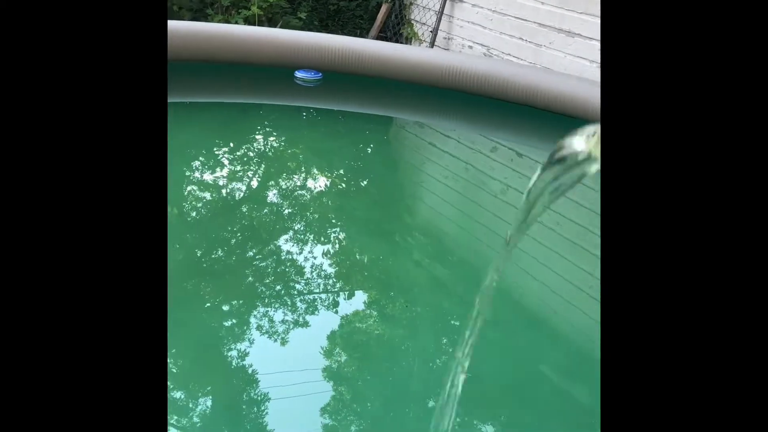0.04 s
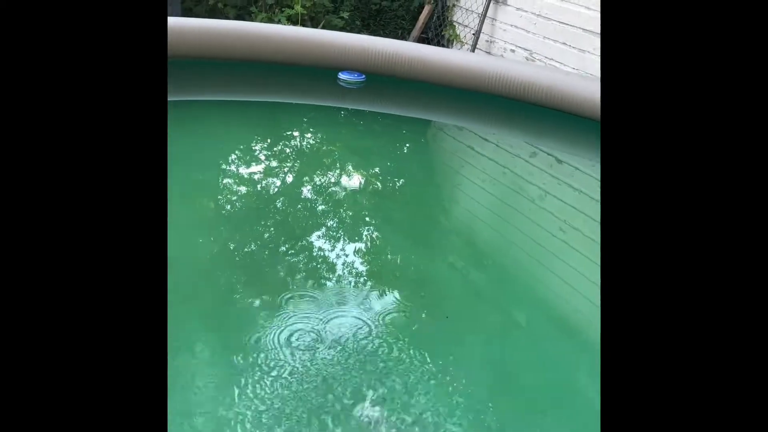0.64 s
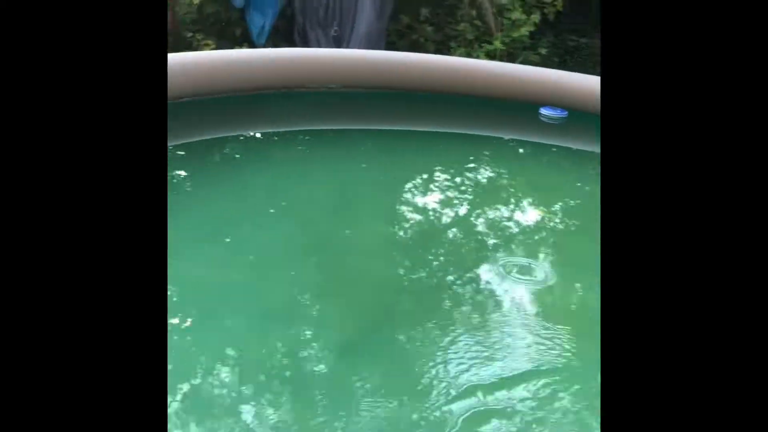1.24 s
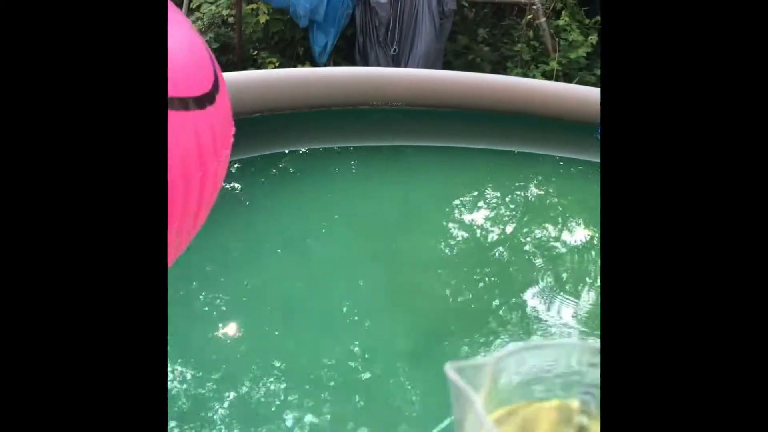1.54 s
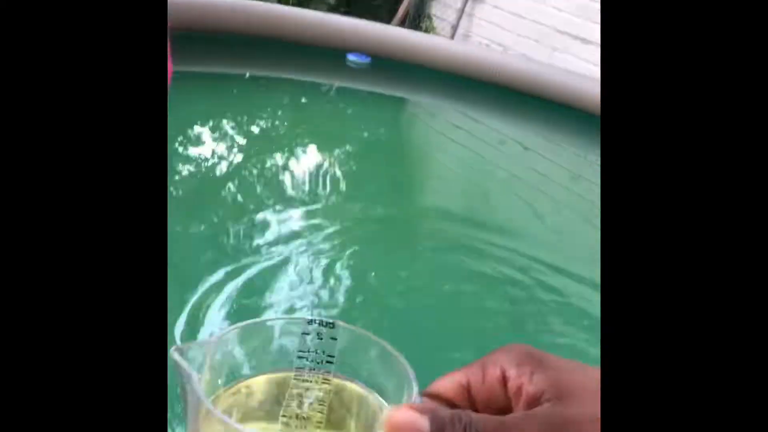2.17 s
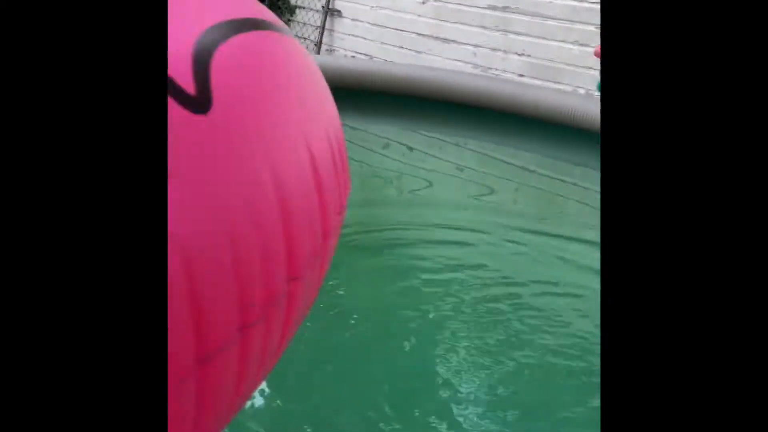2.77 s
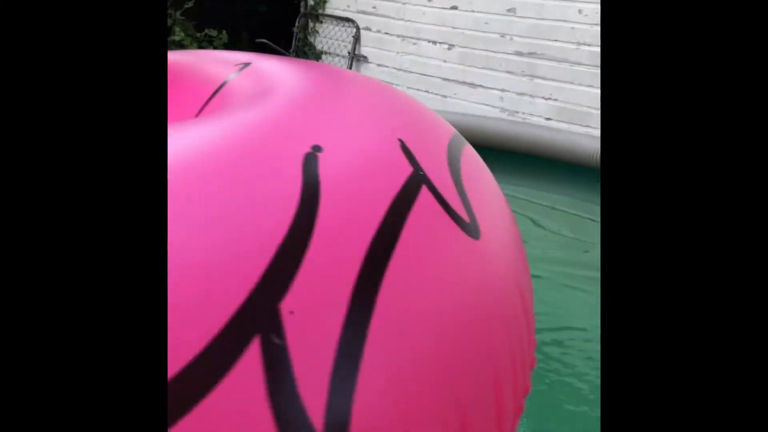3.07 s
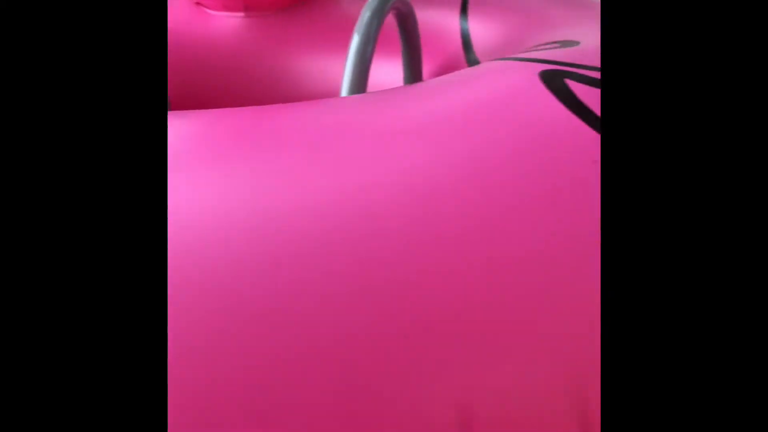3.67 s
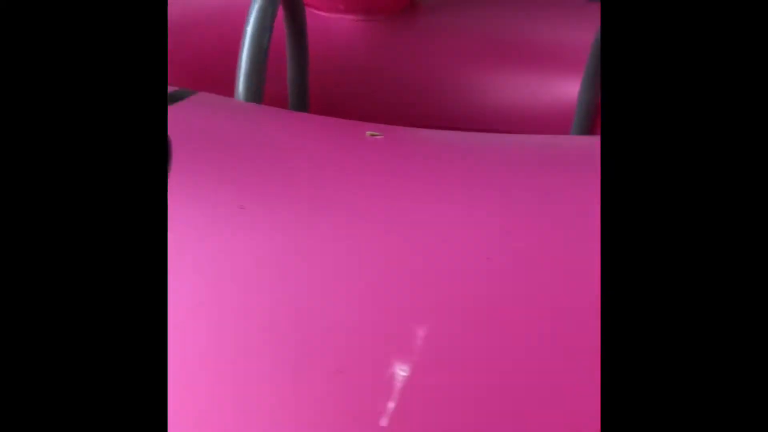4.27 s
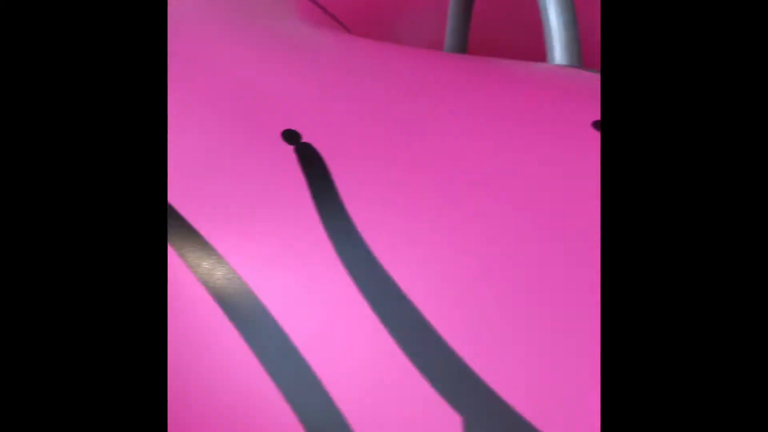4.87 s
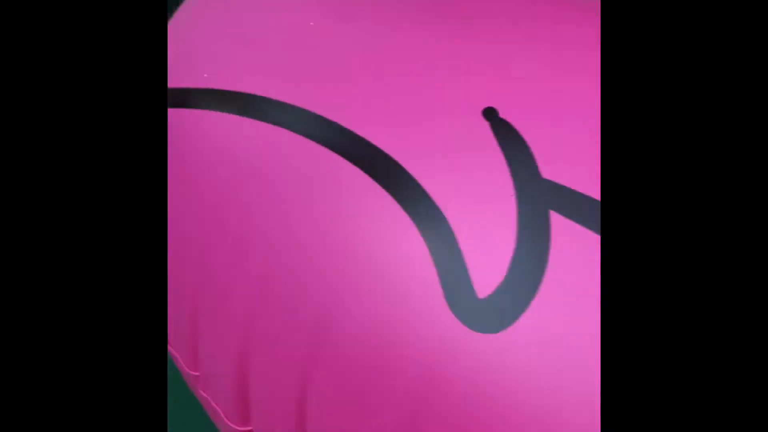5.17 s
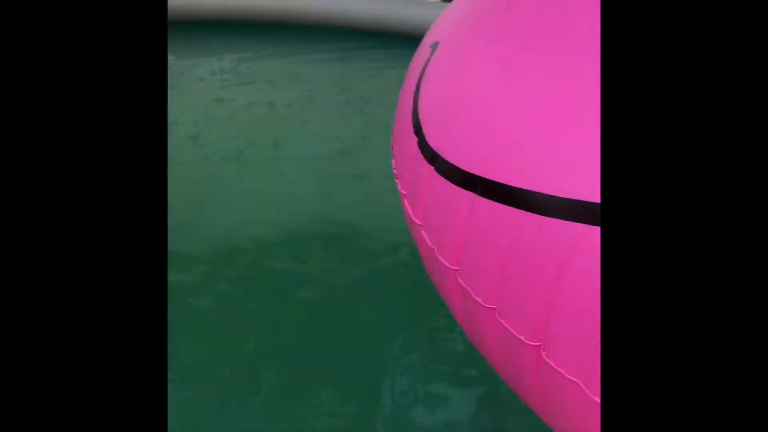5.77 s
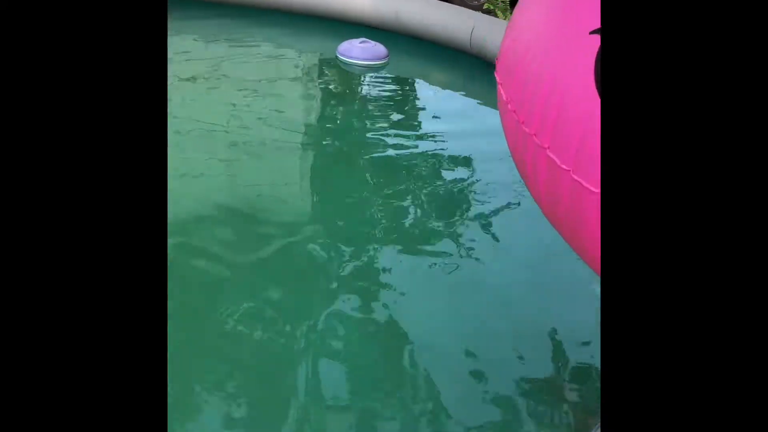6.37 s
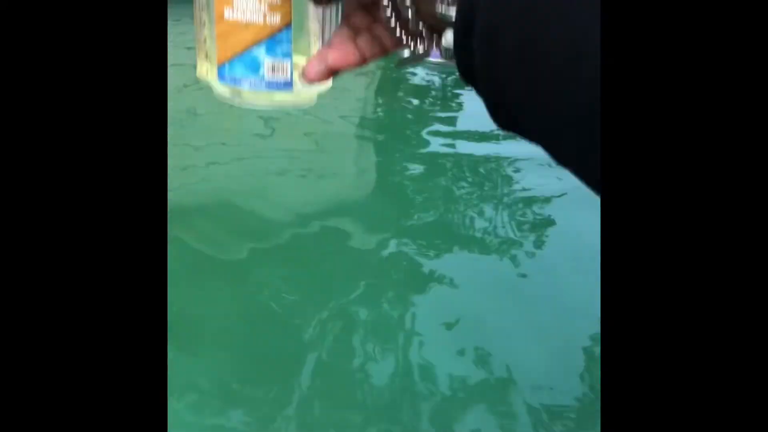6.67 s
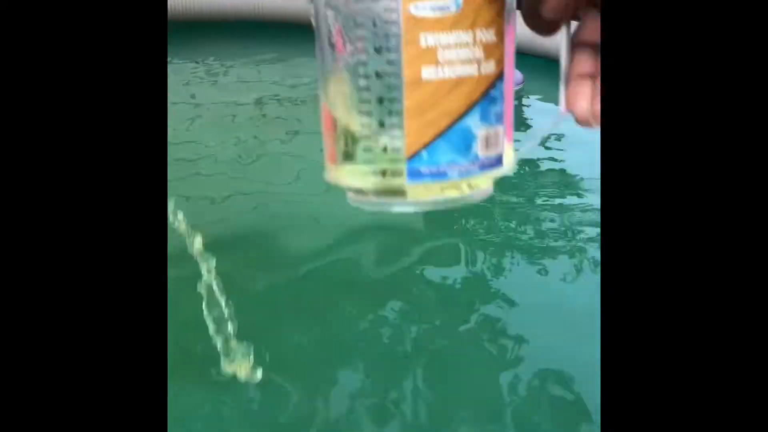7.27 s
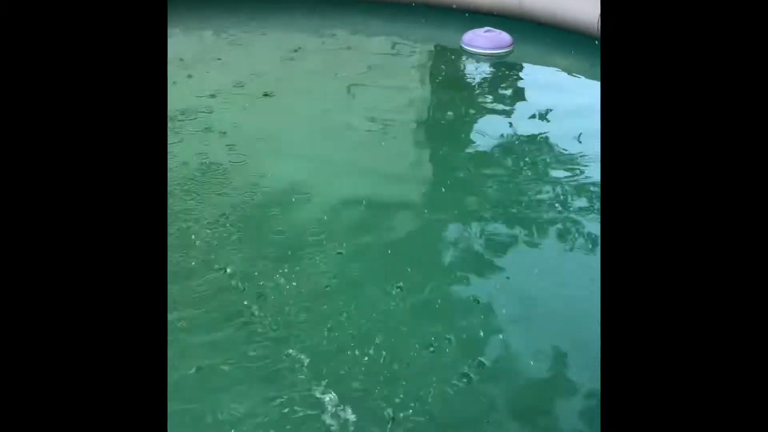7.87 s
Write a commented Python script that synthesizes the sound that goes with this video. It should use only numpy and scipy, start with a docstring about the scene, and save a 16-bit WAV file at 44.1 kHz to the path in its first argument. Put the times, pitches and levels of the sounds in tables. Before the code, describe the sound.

Liquid flung from a plastic jug patters into a garden pool with crackling spray and ringing bubbles, ending in drips. Someone walks round the pool with soft steps and rustling clothes, while small dry ticks sound and distant birds whistle. Near the end a second, shorter splash lands and droplets rain back down. A pump motor hums low throughout under a faint outdoor hush, all heard close to the water.

```python
"""Liquid is flung twice from a plastic jug into a garden pool. The stream patters, traps air bubbles that
ring like tiny bells, and ends in drips. The pool pump's motor hums throughout, under a faint outdoor hush.
Between the pours the person carrying the jug moves round the pool with soft steps and rustling clothes,
there are small dry ticks, and birds whistle in the trees. All is heard from close to the water."""
import sys
import numpy as np
from scipy import signal
from scipy.fft import rfft, irfft, next_fast_len
from scipy.io import wavfile
from scipy.ndimage import map_coordinates

SR = 44100
rng = np.random.default_rng(int(sys.argv[2]) if len(sys.argv) > 2 else 0)


def persist_wave(psi):
    """Save psi, clipped to +-1, as 16-bit WAV."""
    counts = np.round(np.clip(psi, -1, 1) * 32767).astype(np.int16)
    wavfile.write(sys.argv[1], SR, np.atleast_2d(counts).T)


N = 358533


def amp(db):
    """Turn decibels into a number to multiply a sound by."""
    return 10 ** (np.asarray(db) / 20)


def unit(x):
    """Scale a sound to an average (rms) level of 1."""
    return x / np.sqrt(np.mean(x ** 2) + 1e-20)


def curves(rows):
    """Join rows of (time_s, values...) with straight lines: one curve for each column of values."""
    times, *columns = np.transpose(rows)
    return [np.interp(np.arange(N) / SR, times, column) for column in columns]


def wobble(rate):
    """A smooth random curve that heads for a new value rate times a second."""
    points = rng.standard_normal(int(N * rate / SR) + 4)
    return map_coordinates(points, [np.arange(N) * rate / SR], order=2)


def filtered(x, response):
    """Turn each frequency in x up or down by response(hz)."""
    size = next_fast_len(N + 8192)
    return irfft(rfft(x, size) * response(np.fft.rfftfreq(size, 1 / SR)), size)[:N]


def band(x, low_hz, high_hz):
    """Gently fade out what lies below low_hz and above high_hz."""
    return signal.sosfilt(signal.butter(1, [low_hz, high_hz], "band", fs=SR, output="sos"), x)


def coloured(x, tone):
    """Shape x with rows of (pitch_hz, gain_db), then scale it to level 1."""
    pitches, db = np.transpose(tone)
    return unit(filtered(x, lambda hz: amp(np.interp(np.log(hz + 1), np.log(pitches), db, left=-120))))


def noise(tone):
    """Noise with the given tone, at level 1."""
    return coloured(rng.standard_normal(N), tone)


def add(track, start_s, sound):
    """Mix a sound into the track at start_s."""
    part = track[max(round(start_s * SR), 0):][:len(sound)]
    part += sound[:len(part)]


def fade(t, fade_s):
    """A dying-away curve that drops 60 dB every fade_s seconds."""
    return amp(-60 * t / fade_s)


def echo(x, fade_s):
    """The blur of sound bouncing back from walls, fence and trees."""
    t = np.arange(SR) / SR
    tail = rng.standard_normal(len(t)) * fade(t, fade_s) * (t > .005)
    return signal.fftconvolve(x, tail / np.linalg.norm(tail))[:N]


def grains(per_s, centre_hz, spread, cycles, scatter_db, rise, samples):
    """A steady swarm of tiny rings, like bubbles: each fades over a few cycles and rises in pitch."""
    when, pitch, loudness, life = np.hsplit(rng.random((int(per_s * N / SR), 4)), 4)
    hz = np.clip(centre_hz * np.exp(spread * (2 * pitch - 1)), 100, SR / 3)
    strength = amp(scatter_db * np.minimum(-np.log(1 - loudness), 3))
    turns = hz * np.arange(samples) / SR
    age = turns / (cycles * (.5 + life))
    shape = strength * np.sqrt(hz) * np.exp(-age) * (1 - np.exp(-2 * turns))
    rings = shape * np.sin(2 * np.pi * turns * (1 + rise * age))
    where = (when * N).astype(int) + np.arange(samples)
    return unit(np.bincount(where.ravel(), rings.ravel(), N)[:N])


def pump():
    """The motor drones and buzzes, and whirrs in pulses twice a turn, over the rumble of moving water."""
    # the hum shifts as the listener moves through its loud and quiet spots (standing waves)
    # relative levels: time_s, drone_db, buzz_db, growl_db
    levels = [(0.8, -43, -52, -60.5), (1.39, -44, -59, -67), (2.51, -47, -52.5, -55.5),
              (2.96, -44.5, -60.5, -55.5), (3.49, -54.5, -60.5, -59), (3.92, -52.5, -66, -67.5),
              (5.62, -49.5, -64, -62), (6.25, -46, -54, -64), (7.21, -46.5, -60.5, -57.5),
              (7.6, -44.5, -61, -66.5), (8.13, -47.5, -52, -56.5)]
    # motor speed: time_s, turns_per_s
    speed = [(0, 41.45), (2.5, 41.25), (4.5, 41.05), (8.13, 40.95)]
    # the motor's low, middle and high tones: multiple_of_speed, level_db (relative for growl and buzz)
    drone_tones = [(2, -58), (3, -62), (5, -64)]
    growl_tones = [(7.5, -3), (8, 1)]
    buzz_tones = [(9, -9), (10, 2), (11, -7), (12, .5), (14, -4), (16, -9)]
    # tone of the whirr and of the moving water: pitch_hz, gain_db
    whirr_tone = [(240, -24), (380, 10.5), (480, 3.5), (680, -0.5), (1100, -22)]
    rumble_tone = [(22, -30), (38, -9.5), (55, 2), (85, 1.5), (130, -1), (250, -8), (420, -11), (1100, -18),
                   (2500, -53)]
    drone_db, buzz_db, growl_db = curves(levels)
    angle = 2 * np.pi * np.cumsum(curves(speed)[0] * (1 + 0.00079 * wobble(3.9))) / SR

    def hum(tones, waver_db):
        out = np.zeros(N)
        for multiple, db in tones:
            level = amp(db + waver_db * wobble(2.02))
            offset = 2 * np.pi * (multiple % 2) * rng.random()  # even multiples stay in step
            out += level * np.cos(multiple * angle + offset)
        return np.sqrt(2) * out

    buzz = amp(buzz_db - 0.5) * unit(hum(buzz_tones, waver_db=0.8))
    growl = amp(growl_db - 1.5) * unit(hum(growl_tones, waver_db=1.0))
    drone = amp(drone_db - 1) * np.sqrt(2) * np.cos(4 * angle) + hum(drone_tones, waver_db=0.5)
    whirr_db = -63.5 + 0.8 * (buzz_db - buzz_db.mean())  # swells with the buzz
    whirr = amp(whirr_db) * unit((1 + np.cos(2 * angle)) * noise(whirr_tone))
    t = np.arange(N) / SR
    faint_db = np.interp(t, [3, 5, 5.8, 7], [-71, -64.5, -60.5, -66.5])
    faint_hum = amp(faint_db) * np.sqrt(2) * np.sin(2 * np.pi * 226.4 * t)
    return drone + buzz + growl + whirr + faint_hum + amp(-54.5) * noise(rumble_tone)


def garden():
    """The faint hush of the open air."""
    # tone of the hush: pitch_hz, gain_db
    hush_tone = [(400, -11.5), (700, 1), (1300, -1.5), (2200, -4.5), (4200, -8), (7000, -15.5),
                 (11000, -22), (16000, -27)]
    return amp(-61.5 + 1.3 * wobble(4.37)) * noise(hush_tone)


def landing_levels():
    """Relative dB of splash and spray as the liquid lands: each pour builds, breaks off and fizzes out."""
    # each fling of the jug: start_s, length_s, build_up_s, splash_db, spray_db, burst_at_s, burst_db
    pours = [(0.043, 0.58, 0.21, -37.5, -38, 0.62, 5.5), (7.213, 0.21, 0.014, -42.5, -40.3, 7.292, 6.5)]
    cut_db_per_s, fizz_db_per_s = 329, 69
    t = np.arange(N) / SR
    splash_power, spray_power = np.full((2, N), 1e-12)
    for start_s, length_s, build_up_s, splash_db, spray_db, burst_at_s, burst_db in pours:
        age = np.maximum(t - start_s, 0)
        since_end = np.maximum(age - length_s, 0)
        flow = np.maximum(amp(-cut_db_per_s * since_end), amp(-7 - fizz_db_per_s * since_end))
        breakup_db = burst_db * np.exp(-((t - burst_at_s) / 0.033) ** 2)  # a brief burst into spray
        splash_power += (amp(splash_db) * flow * (1 - np.exp(-age / build_up_s))) ** 2
        spray_power += (amp(spray_db + breakup_db) * flow * (1 - np.exp(-age / 0.014))) ** 2
    # spray thrown up by the second, harder fling rains back on the pool
    rain_start_s, rise_s, fall_db_per_s = 7.44, 0.16, 31
    age = np.maximum(t - rain_start_s, 0)
    rain = np.minimum(age / rise_s, 1) ** 2 * amp(-fall_db_per_s * np.maximum(age - rise_s, 0))
    splash_power += (amp(-41) * rain) ** 2
    spray_power += (amp(-44.5) * rain) ** 2
    return 10 * np.log10(splash_power), 10 * np.log10(spray_power)


def stream_share(spray_db):
    """How much of the spray is an unbroken stream (1) rather than loose droplets (0)."""
    return 1 / (1 + np.exp(-(spray_db + 54) / 5))


def stream(splash_db, spray_db):
    """The falling liquid: bubbles in the splash, crackling spray, and a low churn where it digs in."""
    # tone of the splash and of the spray: pitch_hz, gain_db
    splash_tone = [(350, 1), (700, -4.5), (1100, 1), (1700, 4), (3000, -4), (5000, 1), (9000, -33)]
    spray_tone = [(1200, -38.5), (2500, -10), (4000, -2), (6500, 0), (10000, -2.5), (15500, -4.5)]
    bubbling = grains(1000, centre_hz=1605, spread=.95, cycles=5.5, scatter_db=3.6, rise=.06, samples=800)
    crackle = grains(3000, centre_hz=6400, spread=.876, cycles=3.2, scatter_db=5, rise=.039, samples=110)
    churn = grains(420, centre_hz=446, spread=.725, cycles=3.6, scatter_db=1, rise=.075, samples=1400)
    blobs_db = 2 * wobble(140)  # the stream breaks into blobs on its way down
    splash = coloured(bubbling + amp(-13) * rng.standard_normal(N), splash_tone)
    splash *= amp(splash_db + blobs_db - 3.2)
    spray = coloured(crackle + amp(-7) * rng.standard_normal(N), spray_tone)
    spray *= amp(spray_db + blobs_db - 2.2) * np.sqrt(stream_share(spray_db))
    plunge_at_s, width_s = 0.536, 0.078
    plunge = amp(-40.5) * np.exp(-.5 * ((np.arange(N) / SR - plunge_at_s) / width_s) ** 2)
    return splash + spray + plunge * churn


def droplets(spray_db):
    """Loose droplets patter down, standing out as each pour dies away; a few ring as tiny plinks."""
    patter = grains(600, centre_hz=5500, spread=.9, cycles=2.5, scatter_db=3.3, rise=.02, samples=220)
    plinks = grains(70, centre_hz=3300, spread=.55, cycles=11, scatter_db=3, rise=.02, samples=900)
    return amp(spray_db - 0.5) * np.sqrt(1.5 - stream_share(spray_db)) * (patter + amp(-7) * plinks)


def bubble(hz, life_s, glide, swell=0.19, pinch_s=0.00033):
    """Trapped air pinches off with a quick drop in pitch, then rings and glides as it nears the surface."""
    t = np.arange(int(2.5 * life_s * SR)) / SR
    age = t / life_s
    pitch = np.minimum(hz * glide ** (age ** 2) * (1 + np.exp(-t / pinch_s)), SR / 4)
    shape = age / swell * np.exp(1 - age / swell)
    slap_db = -13 - 620 * life_s  # short-lived bubbles burst hardest
    slap = amp(slap_db) * fade(t, 0.027) * rng.standard_normal(len(t))
    return shape * np.sin(2 * np.pi * np.cumsum(pitch) / SR) + slap


def gurgle(splash_db, per_s=30, centre_hz=1743, cycles=16.5):
    """Small bubbles come by chance and follow the splash in strength; lower ones ring for longer."""
    out = np.zeros(N)
    for when, pitch, strength in rng.random((int(per_s * N / SR), 3)):
        hz = centre_hz * np.exp(0.546 * (2 * pitch - 1))
        db = splash_db[int(when * N)] + 0.5 + 6 * (strength - .5)
        add(out, when * N / SR, amp(db) * bubble(hz, life_s=cycles / hz, glide=1.63))
    return out


def big_bubbles():
    """Big pockets of trapped air ring as separate plops."""
    # each plop: start_s, level_db, pitch_hz, life_s, glide (times the pitch is multiplied over one life)
    plops = [(0.143, -35, 542, 0.022, 2.2), (0.158, -29.5, 906, 0.011, 2), (0.198, -33, 870, 0.0092, 1.5),
             (.222, -33, 1370, .008, 1.9), (.243, -30, 1500, 0.0052, 1.4), (.28, -36.5, 940, 0.02, 0.93),
             (0.385, -19, 1200, 0.0077, 2.8), (0.4316, -15, 1660, 0.0042, 1.7),
             (0.436, -11, 4120, 0.0047, 1.3), (.479, -27, 1900, 0.0087, 1.05), (.484, -34, 330, 0.02, .8),
             (0.509, -24.5, 1800, 0.0064, 0.59), (.5105, -22.5, 857, 0.0054, .45),
             (.533, -35, 275, 0.013, 1.9), (0.575, -21.5, 1870, 0.0035, 0.88),
             (.574, -27.5, 1100, .008, 1.2), (0.582, -26.5, 523, 0.01, 2.4),
             (0.618, -27, 2100, 0.0078, 0.99), (0.657, -28.5, 1510, 0.0077, 1.7),
             (0.677, -37, 742, 0.047, 1.3), (.715, -43, 900, 0.02, 2.4), (7.314, -28, 1730, 0.0045, 1.1),
             (7.37, -30.5, 2560, .007, 1.6), (7.3879, -7, 1020, 0.0034, 1.3),
             (7.391, -22, 1530, 0.0039, 1.6), (7.590, -40, 732, 0.043, 1.55),
             (7.678, -37.5, 1360, 0.022, 1.6), (7.718, -40.5, 844, 0.059, 1.5),
             (7.8656, -20, 1402, 0.017, 1.06), (7.871, -38.5, 994, 0.046, 2.2),
             (7.915, -36, 4400, 0.0059, 0.91)]
    out = np.zeros(N)
    for start_s, level_db, pitch_hz, life_s, glide in plops:
        add(out, start_s, amp(level_db) * bubble(pitch_hz, life_s, glide))
    return out


def big_drops(sag=0.22):
    """Each big drop gives a crack, the brief, sagging ring of a tiny bubble and a faint spatter."""
    # drops slapping the surface: start_s, peak_db, pitch_hz
    slaps = [(.1625, -23, 3430), (0.2167, -15, 11600), (.2232, -23, 6600), (.278, -11, 7100),
             (0.3208, -20, 2970), (0.466, -20, 3100), (0.4778, -10.5, 2960), (0.4818, -15, 4220),
             (0.547, -19.5, 7460), (0.594, -12, 5030), (0.5965, -12.5, 6940), (.6084, -10, 5400),
             (.632, -13, 6800), (0.6539, -11.5, 6340), (0.6686, -12, 3400), (0.6765, -8.5, 7760),
             (.7362, -31, 5260), (0.771, -27.5, 2920), (0.807, -37, 6390), (.8445, -38, 5380),
             (.873, -22, 10400), (7.2131, -24, 4100), (7.23, -21, 2520), (7.245, -21, 4500),
             (7.2695, -21, 6200), (7.2806, -19.5, 2920), (7.2993, -17.5, 2980), (7.306, -16.5, 5400),
             (7.3858, -9.5, 3110), (7.3873, -11.5, 7100), (7.408, -23, 5800), (7.6143, -25, 3440),
             (7.6507, -23.5, 2800), (7.7046, -21, 4130)]
    out, t = np.zeros(N), np.arange(SR // 25) / SR
    for start_s, peak_db, pitch_hz in slaps:
        pitch = pitch_hz * (1 + sag * np.exp(-t / 0.00087) - sag / 2)
        ring = np.sin(2 * np.pi * np.cumsum(pitch) / SR)
        crack = 0.76 * rng.standard_normal(len(t))
        spatter = amp(-17) * fade(t, 0.021) * rng.standard_normal(len(t))
        hit = ((ring + crack) * fade(t, 0.0027) + spatter) * (1 - np.exp(-t / 0.00025))
        hit = band(hit, min(pitch_hz / 2, SR / 8), 12000)
        add(out, start_s, amp(peak_db) * hit / np.abs(hit).max())
    return out


def walking(from_s=0.63, until_s=6.7):
    """Each step swells and fades as a dull scuff and a hiss of cloth; clothes crease all along the way."""
    # soft steps, with relative levels: start_s, length_s, scuff_db, hiss_db
    steps = [(1.21, 0.12, -53, -61.5), (1.565, 0.15, -51, -48.5), (1.997, 0.07, -54.5, -59.5),
             (2.479, 0.11, -47, -51.5), (2.722, 0.09, -64, -65), (3.435, 0.092, -61.5, -61),
             (3.946, 0.083, -67, -58), (4.506, 0.28, -80, -63.5), (5.242, 0.34, -70, -62.5),
             (5.826, 0.14, -54.5, -55), (6.3, 0.18, -56.5, -60.5)]
    # tone of the scuff and of the cloth's hiss: pitch_hz, gain_db
    scuff_tone = [(200, -19), (500, 1), (1400, -2.5), (2500, -7), (4000, -8), (8000, -32)]
    hiss_tone = [(1200, -7), (3000, -5), (5000, -0.5), (7500, -5), (12000, -9), (16000, -14)]
    scuff, hiss = np.zeros((2, N))
    t = np.arange(SR) / SR
    for start_s, length_s, scuff_db, hiss_db in steps:
        progress = t / length_s
        swell = 4.45 * progress * np.exp(-4 * progress ** 2)
        settling = amp(-11) * np.minimum(progress, 1) ** 2 * np.exp(-np.maximum(t - length_s, 0) / 0.15)
        add(scuff, start_s, amp(scuff_db) * (swell + settling))
        add(hiss, start_s, amp(hiss_db) * (swell + settling))
    footfall = amp(-43) * fade(t[:SR // 4], 0.049) * (1 - np.exp(-t[:SR // 4] / .002))
    add(scuff, start_s=2.488, sound=footfall)
    fibres = amp(2.4 * wobble(300))  # makes the rubbing grainy
    creases = grains(980, centre_hz=6370, spread=.67, cycles=.9, scatter_db=8, rise=.0087, samples=40)
    t = np.arange(N) / SR
    moving = np.clip(np.minimum(t - from_s, until_s - t) / 0.12, 0, 1)
    cloth = moving * amp(-76.5 + 2.4 * wobble(18)) * creases
    return cloth + fibres * (amp(1.5) * scuff * noise(scuff_tone) + amp(2) * hiss * noise(hiss_tone))


def bird_notes():
    """Every bird note: start_s, length_s, start_hz, end_hz, relative_db, roughness (0 to 1)."""
    # a songbird's single whistles: start_s, length_s, start_hz, end_hz, relative_db
    whistles = [(0.93, 0.035, 2684, 2880, -51.5), (0.958, 0.046, 2870, 2657, -52.5),
                (1.053, .07, 2700, 2410, -66), (1.135, 0.062, 2180, 2460, -59.5),
                (1.508, 0.06, 2750, 3020, -59.5), (1.593, 0.063, 3040, 3070, -51),
                (1.714, 0.053, 2860, 2590, -49), (2.295, 0.044, 2550, 3550, -55.5),
                (2.325, 0.044, 3030, 3010, -53), (3.147, 0.07, 2990, 2860, -68),
                (5.235, 0.148, 2128, 2208, -55.5), (5.44, 0.0496, 2800, 2450, -55.5),
                (6.45, 0.303, 2620, 2560, -75), (6.883, 0.138, 2140, 2060, -70)]
    # its phrase (a flick, a held note, a fall, a rise), timed in shares of the song's length:
    # start_share, length_share, start_hz, end_hz, gain_db
    phrase = [(0.09, .12, 2650, 2150, 3.5), (-.05, 0.7, 2730, 2700, -5.5), (.52, .3, 2660, 2300, 3),
              (.9, 0.2, 2000, 2350, -5)]
    # each time it sings the phrase: start_s, length_s, relative_db
    songs = [(4.658, 0.215, -57), (5.946, .2, -52.5)]
    # a second bird's thin, high falling notes: start_s, relative_db
    slides = [(1.43, -59.5), (2.26, -62), (3.07, -64.5)]
    # a faint twitter of short rising pips: start_s, pitch_hz, relative_db
    pips = [(5.093, 4900, -68), (5.185, 5040, -68), (5.245, 5200, -73), (5.335, 4880, -69),
            (5.76, 3600, -63)]
    # raspy rising chirps: start_s, length_s, centre_hz, relative_db, roughness
    chirps = [(3.81, 0.082, 3010, -66, 0.84), (5.187, 0.09, 2800, -55, 0.46),
              (5.394, 0.07, 3050, -56, 0.58), (5.439, .11, 2724, -52.5, .6),
              (6.169, .08, 4230, -63.5, 0.55)]
    notes = [(s + start * span, share * span, start_hz, end_hz, db + gain_db, 0.08)
             for s, span, db in songs for start, share, start_hz, end_hz, gain_db in phrase]
    notes += [(*whistle, 0.08) for whistle in whistles]
    notes += [(s, 0.04, hz, hz * 1.03, db, 0.12) for s, hz, db in pips]
    notes += [(s, 0.063, 4580, 3700, db, 0.35) for s, db in slides]
    notes += [(s, length, hz * 0.95, hz / 0.95, db, rough) for s, length, hz, db, rough in chirps]
    return notes


def birds():
    """Distant sliding whistles, some of them raspy, blurred by scattered echoes from the trees."""
    out = np.zeros(N)
    rasp, warble, flutter = wobble(1100), wobble(90), wobble(110)
    for start_s, length_s, start_hz, end_hz, db, roughness in bird_notes():
        progress = np.linspace(0, 1, int(length_s * SR))
        now = int(start_s * SR) + np.arange(len(progress))
        hz = start_hz + (end_hz - start_hz) * progress
        hz *= 1 + 0.12 * roughness * rasp[now] + 0.0092 * warble[now]
        level = amp(db + 3.8 * flutter[now]) * np.abs(np.sin(np.pi * progress)) ** 0.47
        add(out, start_s, level * np.sin(2 * np.pi * np.cumsum(hz) / SR))
    return amp(5) * out + echo(out, fade_s=0.41) + amp(-5) * echo(out, fade_s=1.2)


def ticks_and_ping():
    """Small dry ticks, each a snap of noise, and one sharp, very high ping like a drop or tiny bubble."""
    # small ticks of the plastic jug: start_s, relative_db, pitch_hz
    ticks = [(1.782, -38, 5000), (1.909, -35.5, 2000), (2.22, -42, 8000), (2.337, -41.5, 6000),
             (2.613, -39, 7000), (3.217, -29.5, 7140), (4.212, -40, 5060), (4.79, -38.5, 4500),
             (6.404, -30.5, 2500), (6.552, -26.5, 10500), (6.584, -40, 10000), (6.68, -41.5, 8000),
             (6.821, -42, 5500), (6.9133, -44.5, 4500), (7.137, -38, 11000)]
    # the tones in the ping: pitch_hz, relative_db, fade_s
    ping_tones = [(4900, -17, .012), (7940, -4, 0.013), (15500, 6, 0.018)]
    out, t = np.zeros(N), np.arange(SR // 12) / SR

    def snap(hz, fade_s):
        return fade(t, fade_s) * band(rng.standard_normal(len(t)), hz / 2, min(1.34 * hz, SR / 2.2))

    for start_s, db, hz in ticks:
        add(out, start_s, amp(db - 4.5) * snap(hz, fade_s=0.025))
    ring = sum(amp(db) * fade(t, fade_s) * np.sin(2 * np.pi * hz * t) for hz, db, fade_s in ping_tones)
    ping = ring * (1 - np.exp(-t / 0.0013)) + amp(-17) * snap(10500, fade_s=0.07)
    add(out, start_s=6.539, sound=amp(-17) * ping)
    return out


def scene():
    """Mix it all, the same in both ears; the yard faintly echoes the water, the ticks and the ping."""
    splash_db, spray_db = landing_levels()
    pouring = stream(splash_db, spray_db) + droplets(spray_db)
    near = pouring + big_drops() + big_bubbles() + gurgle(splash_db) + ticks_and_ping()
    yard = amp(-17) * echo(near, fade_s=.16)
    mono = near + yard + birds() + walking() + pump() + garden()
    return np.array([mono, mono])


def record(dry):
    """Cut away the very highest treble, above 16100 Hz."""
    return np.array([filtered(channel, lambda hz: hz < 16100) for channel in dry])


dry = scene()
out = record(dry)
persist_wave(out)
```